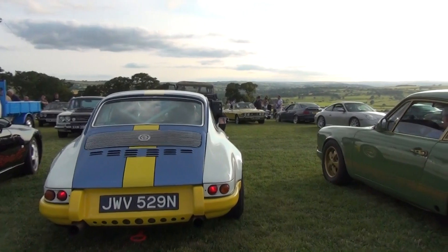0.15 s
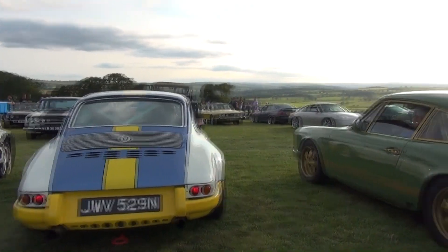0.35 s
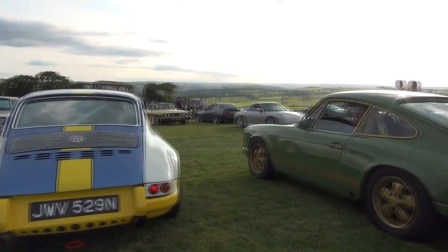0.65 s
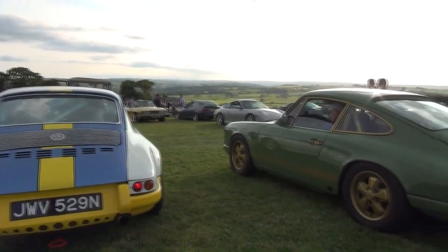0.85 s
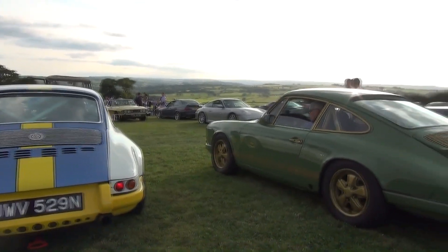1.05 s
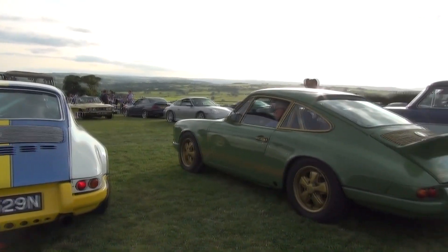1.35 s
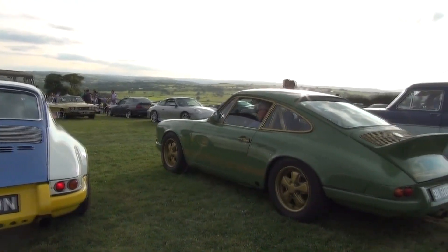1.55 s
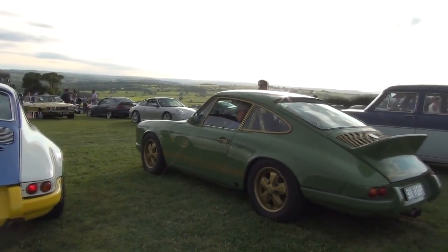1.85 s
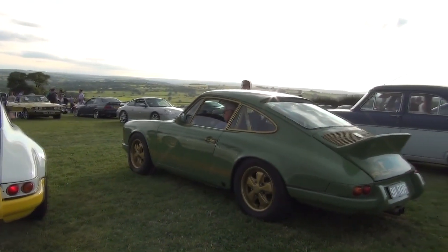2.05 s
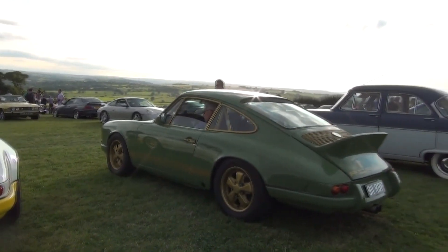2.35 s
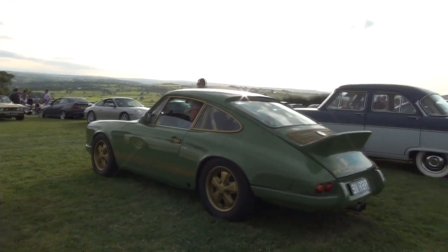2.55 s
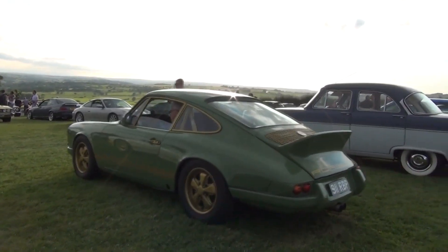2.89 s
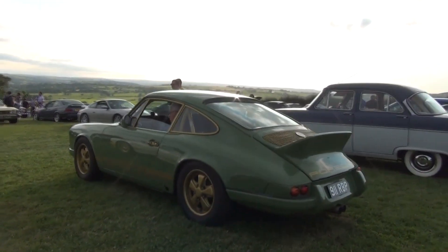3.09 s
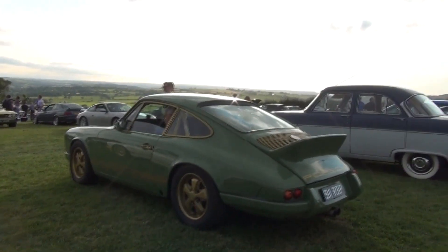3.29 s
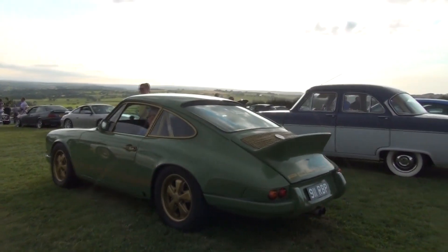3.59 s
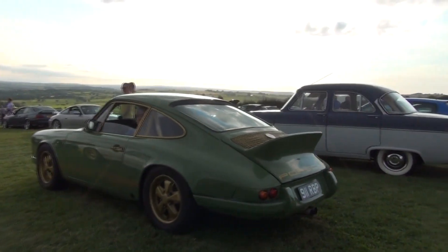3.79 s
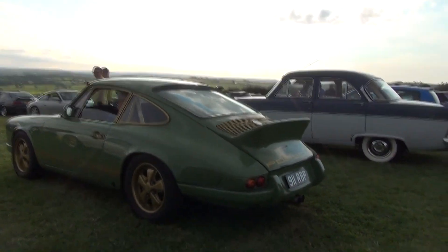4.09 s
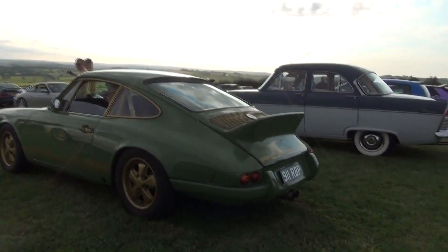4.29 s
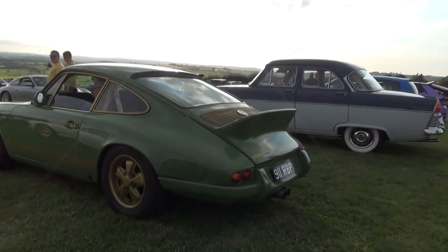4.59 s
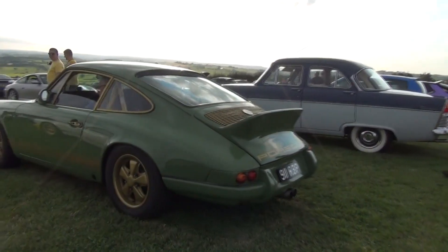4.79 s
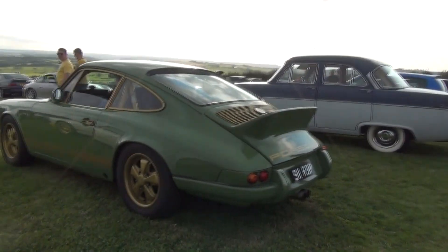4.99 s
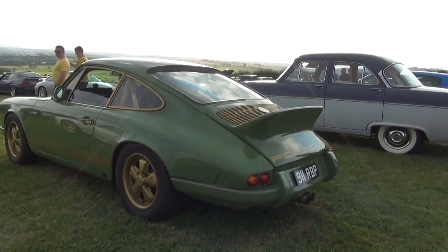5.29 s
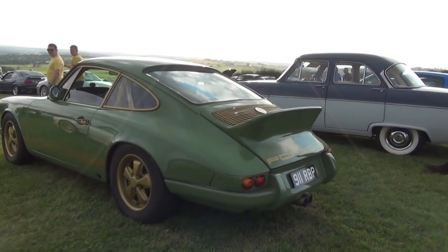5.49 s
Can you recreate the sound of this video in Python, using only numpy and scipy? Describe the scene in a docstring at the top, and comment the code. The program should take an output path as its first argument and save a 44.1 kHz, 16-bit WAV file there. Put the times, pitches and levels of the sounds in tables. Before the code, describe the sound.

Close by on open grass, a lumpy six-cylinder idle thuds and rasps, coughs, then surges into three rising, barking revs.

```python
"""An uneven, thumping idle is heard first: an air-cooled flat six on open grass, a few metres away.
Every firing sends a thump down the pipes and spits a rasp of gas; now and then a cylinder misses.
Then the throttle is blipped: the thumps fuse into a note, the intake barks and the spits run into a rush.
Pulses and shaped noise make the pipes, intake, metal and gas, mostly timed by one crankshaft;
single spits, coughs and pings come at their own listed times."""
import sys
import numpy as np
from scipy import signal
from scipy.fft import rfft, irfft, next_fast_len
from scipy.io import wavfile
from scipy.ndimage import uniform_filter1d

SR = 44100
rng = np.random.default_rng(int(sys.argv[2]) if len(sys.argv) > 2 else 0)


def transcribe(u):
    """Save the signal u as a 16-bit wav file named by the first command-line argument.

    u: samples, shape (n,) or (channels, n), limited to [-1, 1]; the rate is SR.
    q: integer samples, one column per channel.
    """
    v = np.clip(np.atleast_2d(u).T, -1, 1)
    q = np.round(v * 32767).astype(np.int16)
    wavfile.write(sys.argv[1], SR, q)


N = 248724
TIME = np.arange(N) / SR

# blips of the throttle: (start_s, length_s, top_firings_per_s, opening_0_to_1)
BLIPS = [(4.47, .21, 109, .4), (4.865, .158, 170, 1), (5.218, .128, 182, .95)]
# stumbling as the engine picks up from idle: (time_s, unevenness with 0 for none)
STUMBLE = [(3.8, 0.2), (4.05, 1.3), (4.85, 1.4), (4.97, 0)]
# the listener walks past the tailpipes, which beam the rasp:
# (time_s, added_rasp_db, further_db above 9 kHz)
AIM = [(0, 9.5, -8.5), (1.2, 6.5, -8.5), (1.75, 4.5, 0), (2.3, 4.4, -0.5), (2.7, 1.5, -0.5), (3.7, 2, 2.5),
       (4.4, 2, 3.5), (5.1, 3.5, 6.5)]
# tone of the gas rasp: (pitch_hz, relative_level_db)
RASP_TONE = [(500, -45), (1200, -25), (3000, -19.5), (4600, -23.5), (5300, -10), (6050, -3.5), (6700, -5),
             (7400, -6.5), (8500, -12), (11000, -13), (14000, -18), (16000, -34)]
# tone of the intake with the throttle open: (pitch_hz, relative_level_db)
BARK_TONE = [(100, -3.5), (280, -9.5), (470, 1), (620, -5.5), (850, -11), (1300, -8.5), (4000, -48.5)]


def gain_of(db):
    """Turns decibels into a gain."""
    return 10 ** (np.asarray(db) / 20)


def read(points, hz):
    """Reads a tone table at any pitch, by straight lines on a log-frequency axis."""
    f, value = np.transpose(points)
    return np.interp(np.log(hz + 1), np.log(f), value)


def follow(rows):
    """Reads each column of a time table at every sample."""
    s, *columns = np.transpose(rows)
    return [np.interp(TIME, s, column) for column in columns]


def levelled(x, size=8000):
    """Holds the average loudness (running rms, over size samples) at 1; quick beats remain."""
    power = uniform_filter1d(uniform_filter1d(x ** 2, size), size)
    return x / np.sqrt(abs(power) + 1e-20)


def colour(x, points, size=16384):
    """Gives a sound the tone of a table; like a real body, it rings after a pulse and never before."""
    log_gain = np.log(gain_of(read(points, abs(np.fft.fftfreq(size, 1 / SR)))))
    minimum_phase = np.exp(np.conj(signal.hilbert(log_gain)))
    response = np.fft.ifft(minimum_phase).real
    return signal.oaconvolve(x, response[:size // 2])[:N]


def ring(x, hz, width):
    """One resonance, with gain 1 at its own pitch."""
    return signal.lfilter(*signal.iirpeak(hz, hz / width, fs=SR), x)


def clicks(s, heights):
    """Single-sample clicks at the given times."""
    samples = np.clip(np.round(s * SR).astype(int), 0, N)
    return np.bincount(samples, heights, N + 1)[:N]


def puffs(s, heights, rise, decay):
    """A loudness curve that jumps at each time and dies away; rise and decay in seconds."""
    t = TIME[:SR // 8]
    shape = (1 - np.exp(-(t / rise) ** 2)) * np.exp(-t / decay)
    return signal.oaconvolve(clicks(s, heights), shape / shape.max())[:N]


def turbulence(patchy_db, grain_db):
    """Gritty gas noise: loudness jumps every 16 samples and the tone drifts in patches."""
    grain = gain_of(grain_db * rng.standard_normal(N // 16 + 1)).repeat(16)[:N]
    grit = rng.standard_normal(N) * grain
    z = signal.stft(grit, nperseg=256)[2]
    patches = uniform_filter1d(rng.standard_normal(z.shape), size=5, axis=0)  # across pitch
    patches = uniform_filter1d(patches, size=6, axis=1)  # across time
    x = signal.istft(z * gain_of(patchy_db * patches / patches.std()), nperseg=256)[1][:N]
    return x / x.std()


def panned(db):
    """Left and right gains for a left minus right level."""
    return gain_of(np.array([[.5], [-.5]]) * db)


def level(law_db, speed, drive):
    """A layer's gain from the engine speed and from what drives it."""
    idle_rate = 46  # firings per second
    idle_db, octave_db, drive_db = law_db
    return gain_of(idle_db + octave_db * np.log2(speed / idle_rate) + drive_db * drive)


def crank_speed():
    """Firings per second: each blip pulls the speed up, then friction lets it sag."""
    # the idle hunts slowly, then stumbles as the throttle is first touched: (time_s, firings_per_s)
    idle_speed = [(0, 45.51), (.3, 45.75), (1, 44.92), (1.65, 46.52), (2.15, 46.01), (2.45, 44.46),
                  (3.05, 46.46), (3.55, 45.31), (3.8, 45.96), (3.97, 50), (4.1, 47), (4.3, 45.5),
                  (4.46, 48)]
    coast_per_s = 1.22  # rate at which the free engine loses speed, as a share of it
    speed, = follow(idle_speed)
    for start, length, top, _ in BLIPS:
        before = np.interp(start, TIME, speed)
        climb = np.interp(TIME, [start, start + length], [before, top])
        coast = np.exp(-coast_per_s * np.maximum(TIME - start - length, 0))
        speed = np.where(TIME < start, speed, climb * coast)
    return speed


def pedal(lead=0):
    """Throttle opening: it opens, holds and shuts once a blip, shifted earlier by lead seconds."""
    travel_s = .05
    t = TIME + lead
    total = 0
    for start, length, _, opening in BLIPS:
        nearest_end = np.minimum(t - start, start + length - t)
        total = total + opening * np.clip(nearest_end / travel_s + .5, 0, 1)
    return total


def firings(speed, start_turn=0.3114):
    """A cylinder fires whenever the running count of firings passes a whole number; some misfire."""
    # firings that fail to catch: (time_s, loss_db); a layer may take only a share of the loss
    misfires = [(.11, -14), (.153, -13), (.525, -30), (.68, -12), (.791, -93), (.901, -59), (1.19, -59),
                (1.43, -35), (1.452, -26), (1.645, -11), (1.689, -6), (2.122, -12), (2.231, -47),
                (2.385, -10), (2.498, -17), (2.764, -38), (3.026, -37), (3.703, -13), (3.92, -34)]
    # the six cylinders in firing order: (strength_db, header_delay_s, rasp_db)
    cylinders = [(0.5, 0.00648, -2.5), (1.5, 0.00663, 1), (2.5, 0.0068, -4), (1.5, 0.00621, 0.2),
                 (0.5, 0.00766, -4), (1.5, 0.0062, -1.5)]
    turns = np.floor(np.cumsum(speed) / SR + start_turn)
    s = TIME[1:][np.diff(turns) > 0]
    loss_db = np.zeros(len(s))
    for when, db in misfires:
        loss_db[np.argmin(abs(s - when))] = db
    return s, np.array(cylinders)[np.arange(len(s)) % len(cylinders)].T, loss_db


def exhaust(s, cylinder, loss_db, speed, fused, uneven_db=.9, jitter=.00024, miss_share=.22,
            churn_db=-8, stumble_db=7, fast_churn_db=-11):
    """Pulses of six unequal cylinders ring the pipes over churning gas; at speed they fuse into a drone."""
    # response of pipes and silencer: (pitch_hz, relative_level_db)
    pipe_tone = [(15, -74), (33, -57), (46, -9.5), (68, -2.5), (92, -0.5), (118, 3.5), (138, 6.5),
                 (165, -1.5), (190, -2.5), (230, -11), (280, -18), (350, -26), (500, -57), (1200, -74.5)]
    # churning gas in the silencer: (pitch_hz, relative_level_db)
    churn_tone = [(15, -67), (36, -23.5), (72, -8), (115, 2.5), (160, -7.5), (205, 1), (255, -9),
                  (320, -23.5), (450, -28.5), (900, -47), (2000, -104)]
    strength_db, delay, _ = cylinder
    stumble, = follow(STUMBLE)
    # stumbling makes both the strength and the timing of the pulses less even
    a, b = rng.standard_normal((len(s), 2)).T * (1 + np.interp(s, TIME, stumble))
    pulse_db = strength_db + uneven_db * a + miss_share * loss_db
    pulses = clicks(s + delay + jitter * b, gain_of(pulse_db))
    drone = np.sqrt(2) * np.sin(2 * np.pi * np.cumsum(speed) / SR)
    flow = 5.3 + puffs(s, np.ones(len(s)), 0.0039, 0.0017)
    churn = colour(rng.standard_normal(N) * flow, churn_tone)
    mix_db = churn_db + fused * (fast_churn_db - churn_db) + stumble_db * stumble
    beats = (1 - fused) * levelled(colour(pulses, pipe_tone)) + fused * drone
    return levelled(beats + gain_of(mix_db) * levelled(churn, size=2500), size=3000)


def rasp(s, cylinder, loss_db, revved, uneven_db=2.0, afterburn=0.083, between=0.11, fan=0.7):
    """Each firing spits gas, harder just after a misfire; at speed the fan's steady rush fills the gaps."""
    # tone of the rush at speed: (pitch_hz, relative_level_db)
    rush_tone = [(500, -56.5), (1200, -6), (3000, -5), (4700, -2.5), (5300, -2), (5900, 8), (6600, 3.5),
                 (7500, 2.5), (8500, -4.5), (11000, -11.5), (14000, -15), (16000, -26)]
    after_miss_db = -afterburn * np.roll(loss_db, 1)
    uneven = uneven_db * rng.standard_normal(len(s))
    heights = gain_of(cylinder[2] + loss_db + after_miss_db + uneven)
    gate = between + puffs(s, heights, rise=0.004, decay=0.0092)
    spit = colour(gate * turbulence(patchy_db=3.5, grain_db=2.5), RASP_TONE)
    rush = colour((fan + gate) * turbulence(patchy_db=2.0, grain_db=1.5), rush_tone)
    return levelled(np.sqrt(1 - revved) * spit + np.sqrt(revved) * .5 * rush)


def aimed(x, corner_hz=9000):
    """The highest treble leaves the pipes in a narrow beam, so it changes as the listener walks."""
    _, top_db = follow(AIM)
    top = signal.sosfiltfilt(signal.butter(3, corner_hz, "high", fs=SR, output="sos"), x)
    return x + (gain_of(top_db) - 1) * top


def swirl(x, revved, radians=0.84, lean_db=-5.5, corner_hz=7200, size=160):
    """The top of the idle's rasp reaches each ear by its own wandering path, which shifts its phase."""
    top = signal.sosfiltfilt(signal.butter(4, corner_hz, "high", fs=SR, output="sos"), x)
    wander = uniform_filter1d(uniform_filter1d(rng.standard_normal((2, N)), size), size)
    phase = radians * (1 - revved) * wander / wander.std()
    turned = (signal.hilbert(top) * np.exp(1j * phase)).real
    return x - top + turned * panned(lean_db * (1 - revved))


def bark(s, uneven_db=6.5, between=1.0):
    """Hollow chuffs of the carburettors' intake, one a firing, over steady intake noise."""
    heights = gain_of(uneven_db * rng.standard_normal(len(s)))
    gate = between + puffs(s, heights, rise=0.0031, decay=0.019)
    return levelled(colour(gate * rng.standard_normal(N), BARK_TONE))


def tinware(drive, revved):
    """Knocks and gas ring the cooling shrouds; other panels take over at speed."""
    # resonances of the shrouds: (pitch_hz, width_hz, idle_db, revved_db)
    panels = [(1112, 51, 1, 20), (1477, 80, 9.5, -29), (1650, 173, 4.5, -1), (1828, 100, -2, 19),
              (2190, 140, 5, 9.5), (2406, 240, 7.5, -38), (3080, 370, 4.5, -3), (3524, 120, 4.5, 16),
              (3700, 37, 3, 16)]
    total = 0
    for hz, width, idle_db, rev_db in panels:
        total = total + gain_of(idle_db + revved * (rev_db - idle_db)) * ring(drive, hz, width)
    return total


def clatter(s, loss_db, revved, uneven_db=-8.5, between=1.0, miss_share=1.0):
    """Valve gear and gas knock on the tinware once a firing."""
    heights = gain_of(miss_share * loss_db + uneven_db * rng.standard_normal(len(s)))
    gate = between + puffs(s, heights, rise=0.001, decay=0.019)
    return levelled(tinware(gate * turbulence(patchy_db=1.5, grain_db=0.5), revved))


def tappets(s, loss_db, revved, tick_db=-27, uneven_db=4, low_hz=2250, high_hz=3900,
            decay=0.0058, lag=0.002032):
    """Just after each firing a rocker ticks, at its own pitch and strength; the ticks fade at speed."""
    t, ticks = TIME[:SR // 25], np.zeros(N + SR)
    for when, loss, (strength, pitch) in zip(s, loss_db, rng.standard_normal((len(s), 2))):
        hz = np.interp(pitch, [-1.5, 1.5], [low_hz, high_hz])
        at = int(abs(when + lag) * SR)
        height = gain_of(tick_db + loss + uneven_db * min(strength, 1))
        ticks[at:at + len(t)] += height * np.sin(2 * np.pi * hz * t) * np.exp(-t / decay)
    return ticks[:N] * (1 - revved)


def spits(revved, harsh, tin_db=-13, rise=0.0019):
    """Late-burning mixture spits and shakes the tinware; the spits turn harsher as the engine picks up."""
    # sharp single spits: (time_s, burst_db, decay_s)
    bursts_table = [(0.038, -16.5, 0.011), (0.172, -17, .01), (0.344, -16, 0.0052), (.389, -25, 0.0058),
                    (0.431, -17, 0.014), (0.541, -15.5, 0.0064), (.743, -18, 0.0072), (0.875, -22, 0.0078),
                    (1.051, -16.5, 0.0068), (1.273, -21, 0.012), (2.138, -28, .008), (3.456, -28, 0.012),
                    (3.823, -18.5, 0.013), (3.961, -17, .012), (4.018, -16.5, 0.033), (4.06, -20, 0.05),
                    (4.317, -14, 0.019), (4.358, -18, 0.042), (4.444, -21.5, 0.045), (4.523, -18, 0.041),
                    (4.6, -18, 0.038), (4.635, -31, 0.012), (4.891, -20, 0.066)]
    # a harsh spit, brighter than the idle's rasp: (pitch_hz, relative_level_db)
    harsh_tone = [(500, -53), (1300, -5.5), (4700, -4), (6100, 6), (8000, -3.5), (13000, -8), (16000, -17)]
    gas = turbulence(patchy_db=2.0, grain_db=3.5)
    bursts = sum(puffs(np.array([s]), [gain_of(db)], rise, decay) for s, db, decay in bursts_table)
    soft_hiss = levelled(colour(gas, RASP_TONE))
    harsh_hiss = levelled(colour(gas, harsh_tone))
    hiss = levelled((1 - harsh) * soft_hiss + harsh * harsh_hiss)
    return bursts * (hiss + gain_of(tin_db) * levelled(tinware(gas, revved)))


def coughs(trim_db=-8):
    """Single hollow puffs back through the carburettors."""
    # the puffs: (time_s, level_db before the trim)
    s, db = np.transpose([(2.461, -18), (3.268, -19.5), (3.362, -22.5), (3.548, -21.5), (3.731, -20.5),
                          (4.111, -16.5), (4.369, -15.5), (4.42, -18.5), (4.55, -18)])
    envelope = puffs(s, gain_of(db + trim_db), rise=0.0016, decay=0.033)
    return envelope * levelled(colour(rng.standard_normal(N), BARK_TONE))


def pings(trim_db=-7, decay=0.0081):
    """A loose tappet rings briefly, as a sine that dies away."""
    # the loudest tappet pings: (time_s, level_db before the trim, pitch_hz)
    ping_table = [(2.673, -15, 3010), (2.7187, -11, 3730), (3.109, -12, 3250), (3.455, -8, 3000),
                  (3.719, -11.5, 3030), (3.7653, -15, 3060)]
    t = TIME[:SR // 16]
    total = 0
    for s, db, hz in ping_table:
        tone = np.sin(2 * np.pi * hz * t) * np.exp(-t / decay)
        total = total + signal.oaconvolve(clicks(np.array([s]), [gain_of(db + trim_db)]), tone)[:N]
    return total


def rev_note(speed, throttle, load, growl_shut_db=-31, growl_open_db=-23):
    """Under load pulses steepen: overtones sing over a growl; two unequal banks add half orders."""
    # gas in the pipes at speed: (pitch_hz, relative_level_db)
    growl_tone = [(20, -25), (60, 3.5), (120, -8), (200, 1.5), (300, 2), (420, -3.5), (520, -17),
                  (750, -30.5)]
    # engine orders when revved: (multiple of the firing rate, shut_throttle_db, open_throttle_db)
    overtones = [(1.5, -28.5, -24), (2, -35, -17), (2.5, -39, -30), (3, -48, -32)]
    turns = np.cumsum(speed) / SR
    gusts = (.3 + np.exp(-(turns % 1) / 0.67)) * rng.standard_normal(N)
    growl_db = growl_shut_db + throttle * (growl_open_db - growl_shut_db)
    note = gain_of(growl_db) * levelled(colour(gusts, growl_tone))
    for multiple, shut_db, open_db in overtones:
        slow_noise = uniform_filter1d(uniform_filter1d(rng.standard_normal(N), size=600), size=600)
        tone_db = shut_db + load * (open_db - shut_db) + 2 * levelled(slow_noise)
        note += gain_of(tone_db) * np.sin(2 * np.pi * (multiple * turns + rng.random()))
    return note


def field(x, decay=0.0032):
    """Weak reflections off parked cars differ at each ear; the camera body shades each side."""
    # reflections off the cars: (pitch_hz, level_db)
    scatter_tone = [(150, -35), (300, -15.5), (550, -5), (1100, -4), (3000, -27), (6000, -11),
                    (9000, -12.5), (14000, -28.5)]
    # balance of the two sides: (pitch_hz, left_minus_right_db)
    side_balance = [(60, -9.5), (92, -2), (140, -0.8), (210, -2.0), (330, -8.5), (500, -6.5), (770, -13),
                    (1170, -3), (1790, -6), (2740, -0.5), (4190, 1.5), (6410, 6.5), (9810, 1), (15000, 0.5)]
    t = TIME[:SR // 12]
    sparse = rng.standard_normal((2, len(t))) * (rng.random((2, len(t))) < .05)
    taps = sparse * np.exp(-t / decay) * (t > .003)
    middle = x.mean(0)
    echoes = np.array([colour(signal.oaconvolve(middle, h / np.linalg.norm(h))[:N], scatter_tone)
                       for h in taps])
    size = next_fast_len(N + SR // 4)
    sides = panned(read(side_balance, np.fft.rfftfreq(size, 1 / SR)))
    return irfft(rfft(x + echoes, size) * sides / sides.mean(0), size)[:, :N]


def scene():
    """Mixes pipes, intake, metal and gas; one crank speed sets the firings and the layers' levels."""
    # level of each layer: (idle_db, db_per_octave of speed, db_added by its drive)
    boom_law = (-11.5, -4, 8)  # driven by load at the pipes' resonance
    bark_law = (-39.5, -4.5, 15)  # driven by the open throttle
    clatter_law = (-30.5, 3, -6)  # falls back while the pipes boom
    # (from, to) in firings per second: the spits merge into a rush
    revved_rates = (46.5, 70)
    # (from, to) in firings per second: that rush swells and other panels ring
    racing_rates = (81, 140)
    pipe_hz, pipe_width_hz = 169, 34  # the pipes boom when a loaded engine fires near this rate
    pickup_s = 0.035  # how long the engine takes to answer the throttle
    idle_rasp_db, racing_rasp_db, booming_rasp_db = -30, 11.5, -6.5  # the last two are added
    rev_lean_db = -3.5  # left minus right: the racing engine's metal and gas come from further right

    speed, throttle, load = crank_speed(), pedal(pickup_s), pedal()
    stumble, = follow(STUMBLE)
    booming = load * np.exp(-((speed - pipe_hz) / pipe_width_hz) ** 2)
    revved = np.interp(speed, revved_rates, [0, 1])
    racing = np.interp(speed, racing_rates, [0, 1])
    fused = np.interp(speed, [60, 73], [0, 1])  # single beats run together into a note
    s, cylinder, loss_db = firings(speed)

    # stumbling weakens the boom of single beats and lifts that of the fused note
    boom = level(boom_law, speed, booming) * gain_of(-1.5 * stumble * (0.5 - fused))
    pipes = boom * exhaust(s, cylinder, loss_db, speed, fused)
    pipes = pipes + fused * rev_note(speed, throttle, load)

    intake = level(bark_law, speed, throttle) * bark(s) + coughs()

    # stumbling softens the knocks a little
    knock_gain = level(clatter_law, speed, booming) * gain_of(-1 * stumble)
    knocks = knock_gain * clatter(s, loss_db, racing)
    metal = knocks + tappets(s, loss_db, revved) + pings()

    rasp_db = idle_rasp_db + follow(AIM)[0] + racing_rasp_db * racing + booming_rasp_db * booming
    steady_gas = swirl(aimed(gain_of(rasp_db) * rasp(s, cylinder, loss_db, revved)), revved)
    gas = steady_gas + aimed(spits(revved, harsh=np.clip(stumble + revved, 0, 1)))
    return field(pipes + intake + (metal + gas) * panned(rev_lean_db * revved))


def record(dry):
    """The recorder's band limit: a steep filter removes the highest treble."""
    edge_hz = 16100
    lowpass = signal.firwin(511, edge_hz, window=("kaiser", 9), fs=SR)
    return signal.oaconvolve(dry, lowpass[None], "same")


dry = scene()
out = record(dry)
transcribe(out)
```